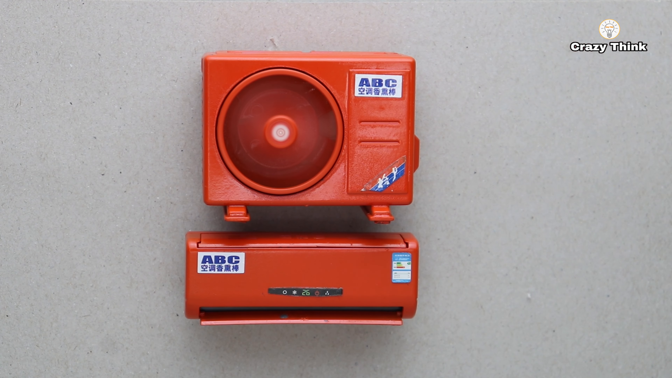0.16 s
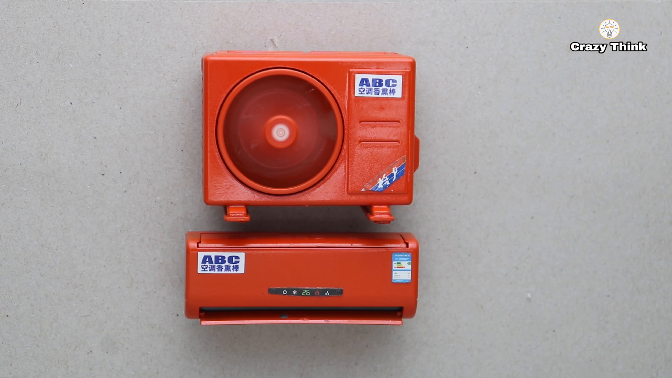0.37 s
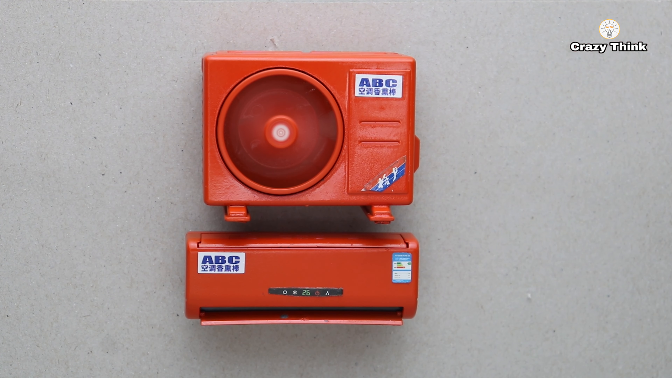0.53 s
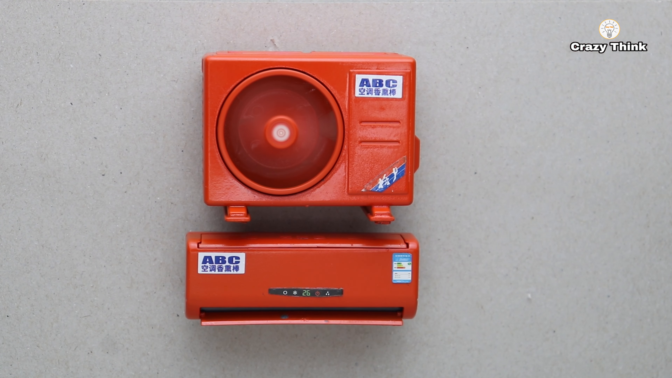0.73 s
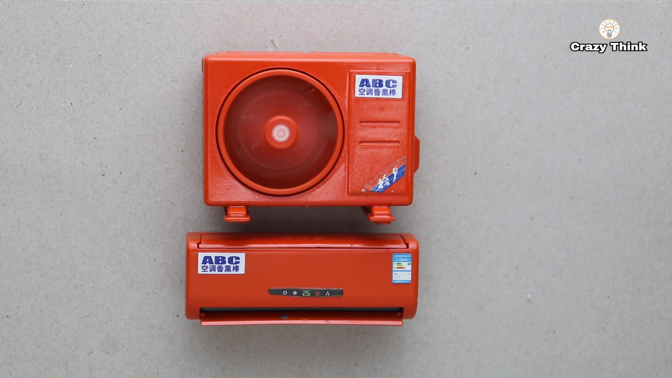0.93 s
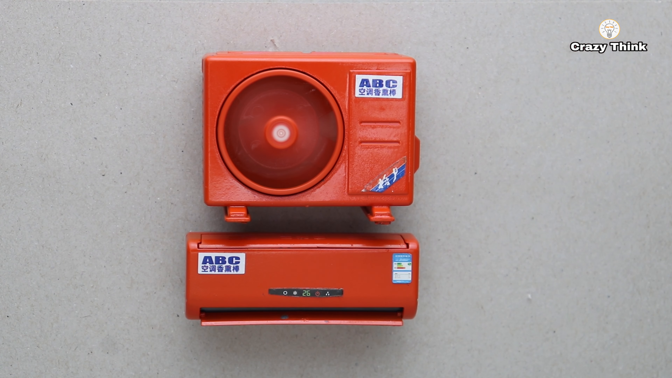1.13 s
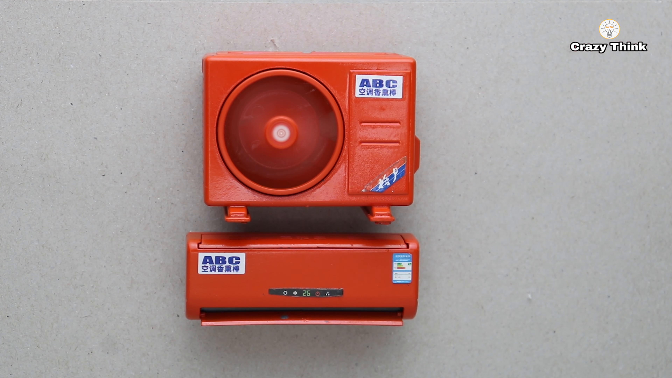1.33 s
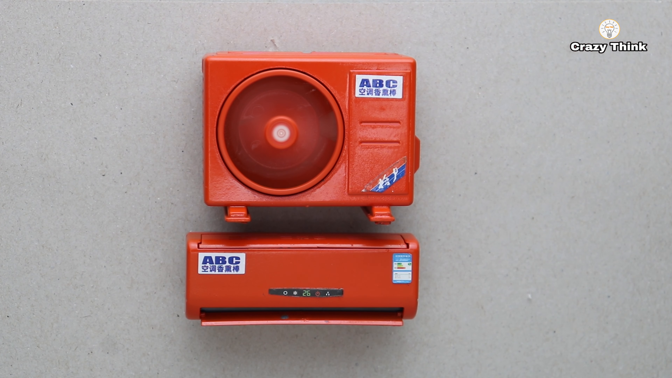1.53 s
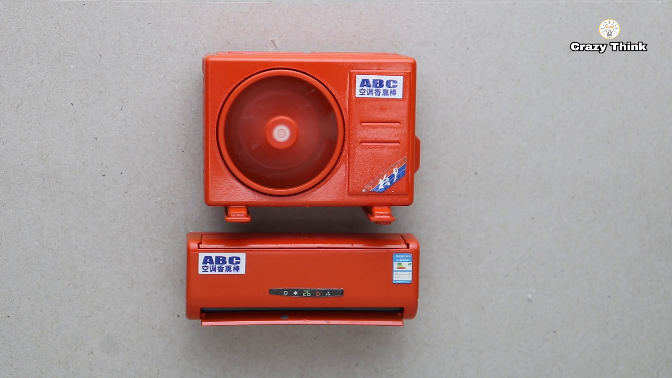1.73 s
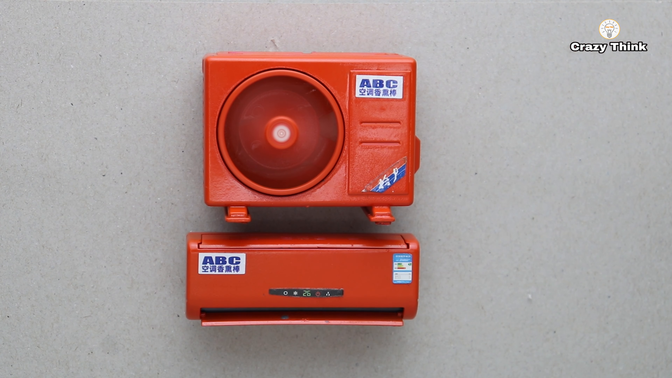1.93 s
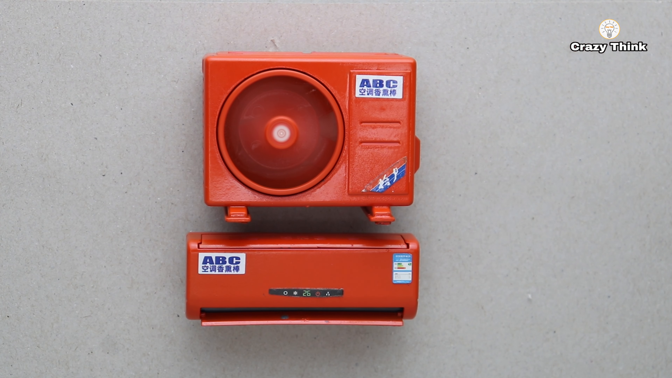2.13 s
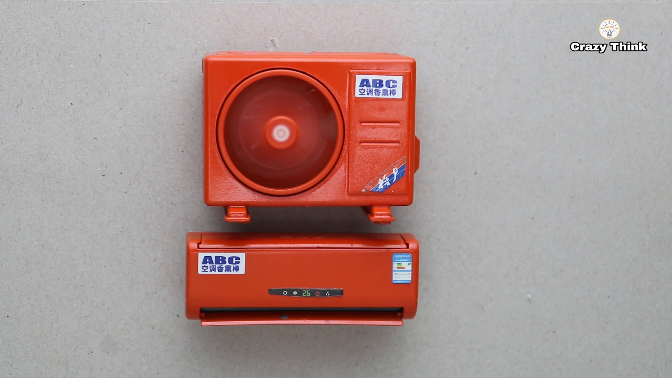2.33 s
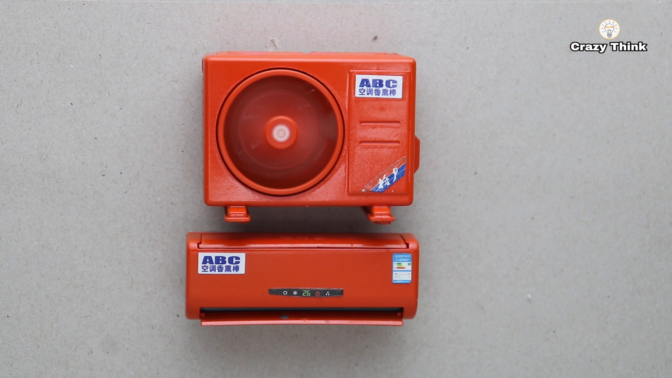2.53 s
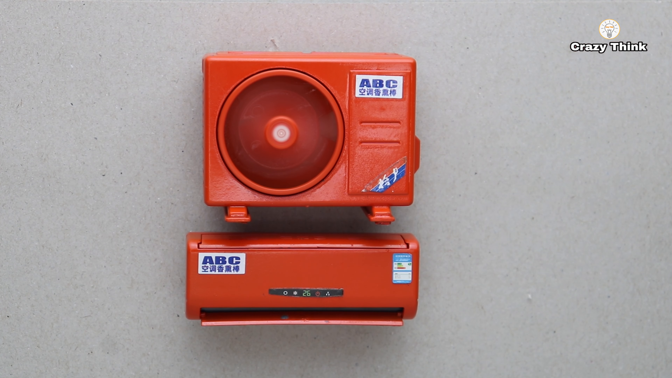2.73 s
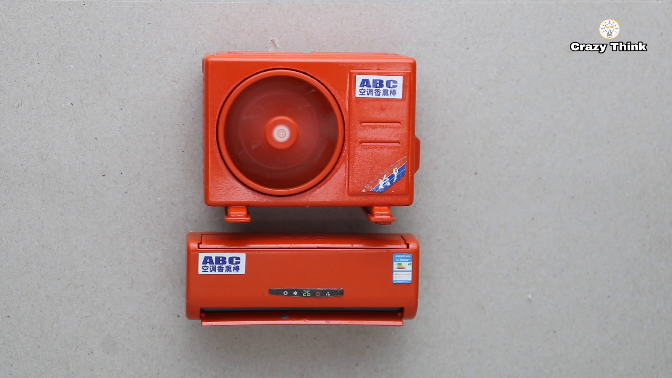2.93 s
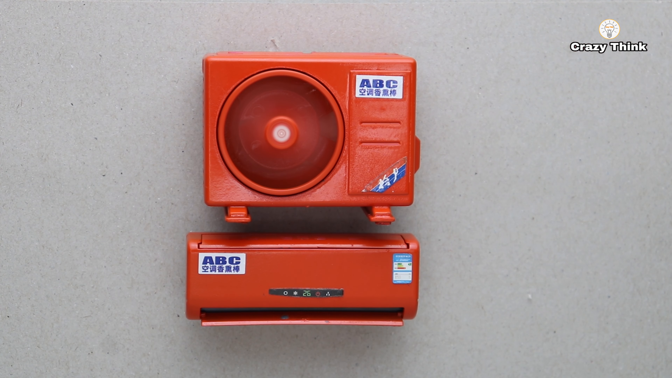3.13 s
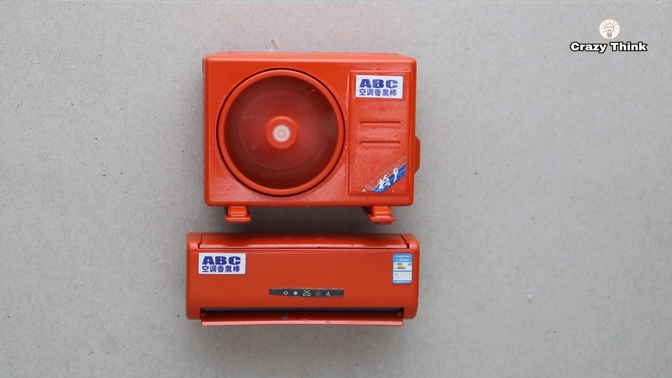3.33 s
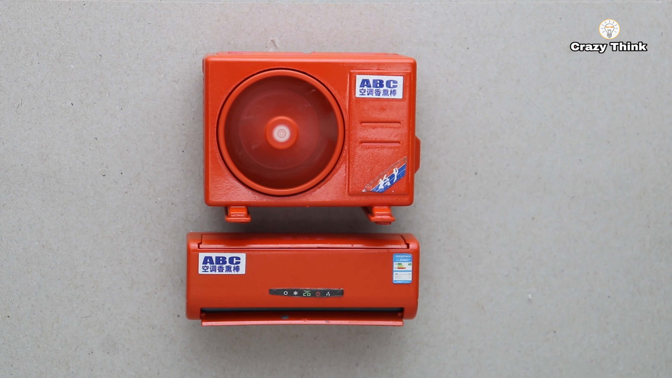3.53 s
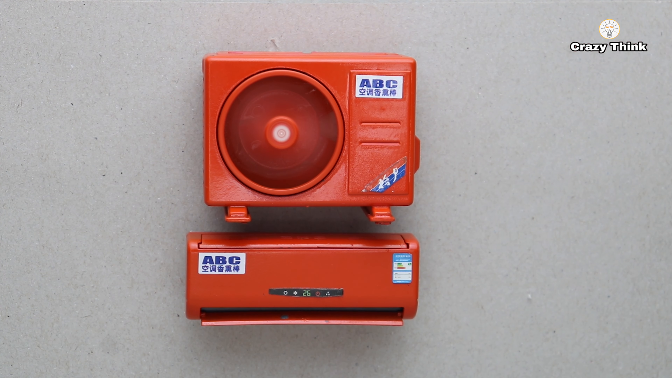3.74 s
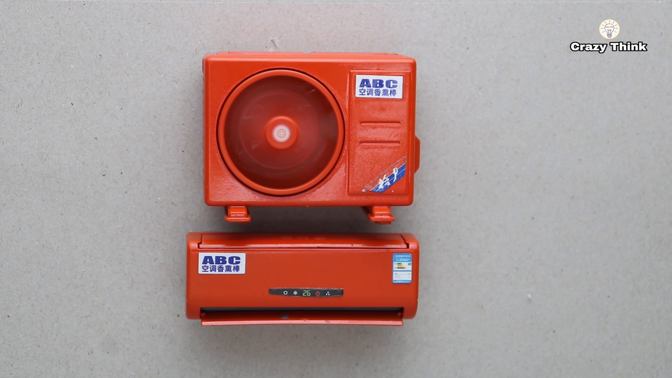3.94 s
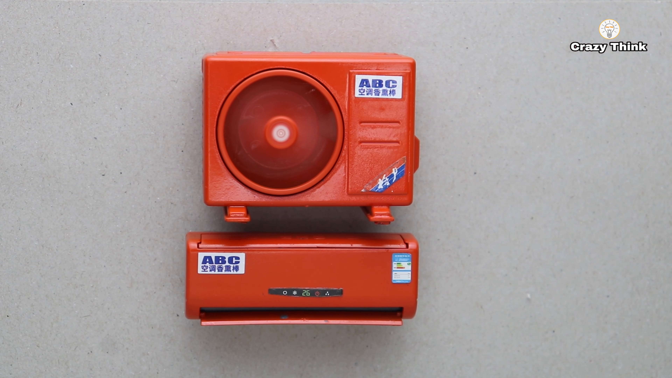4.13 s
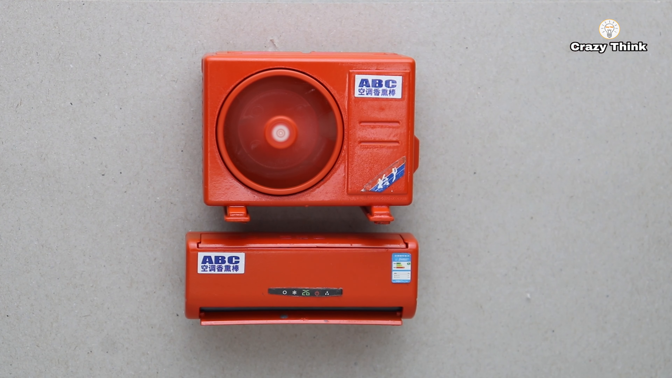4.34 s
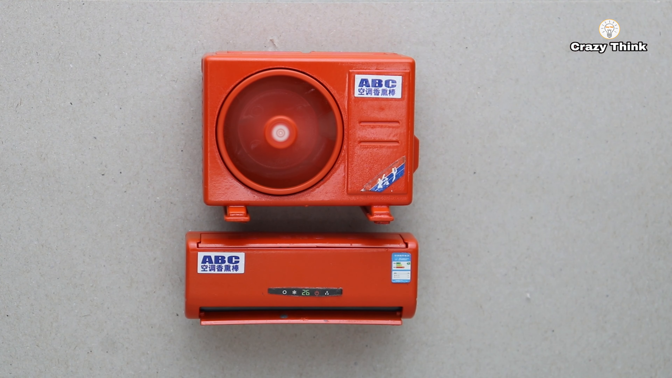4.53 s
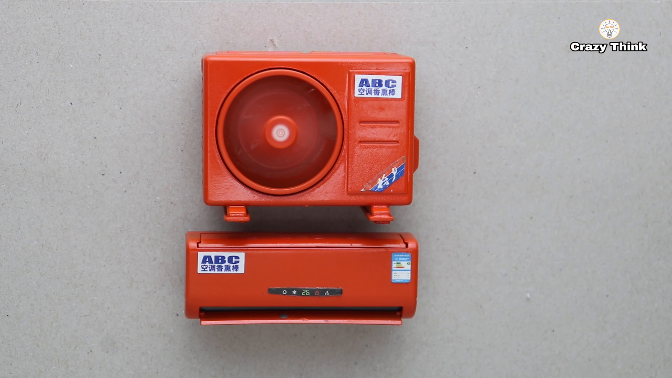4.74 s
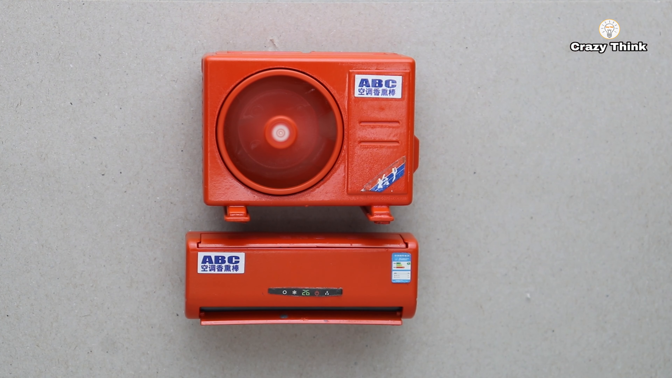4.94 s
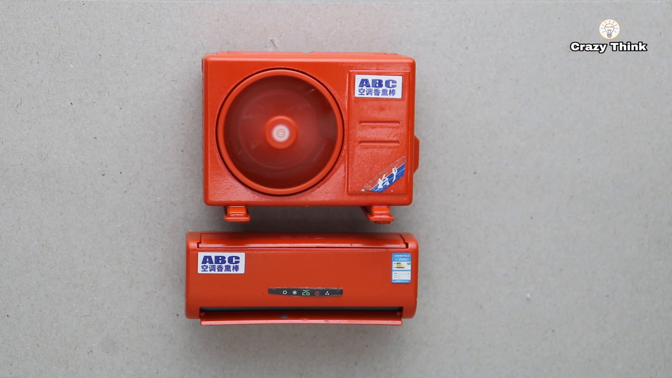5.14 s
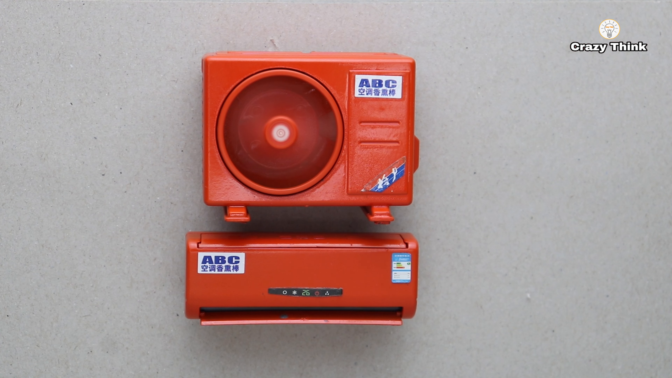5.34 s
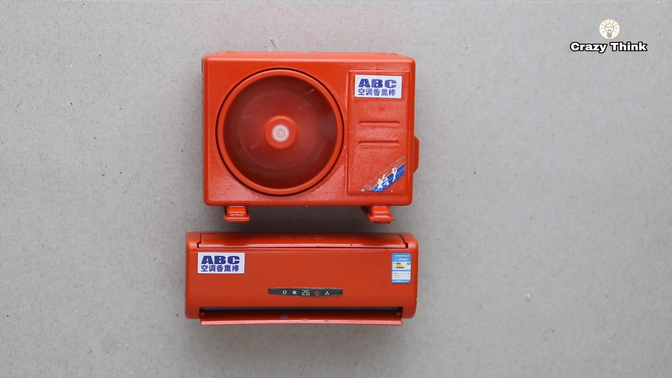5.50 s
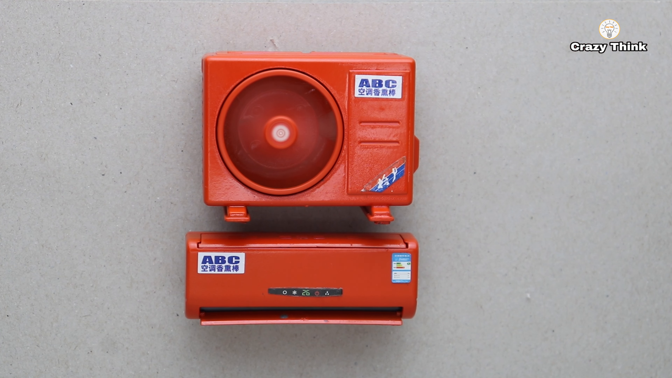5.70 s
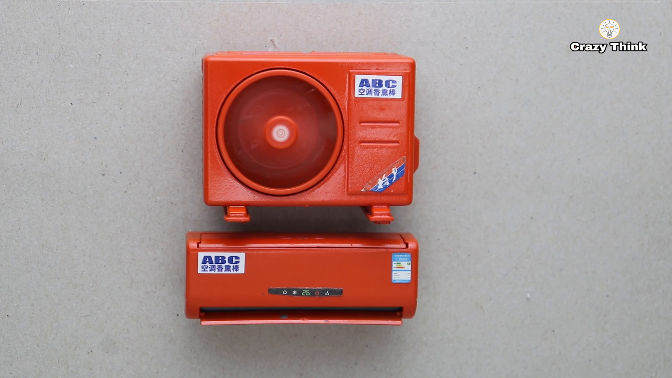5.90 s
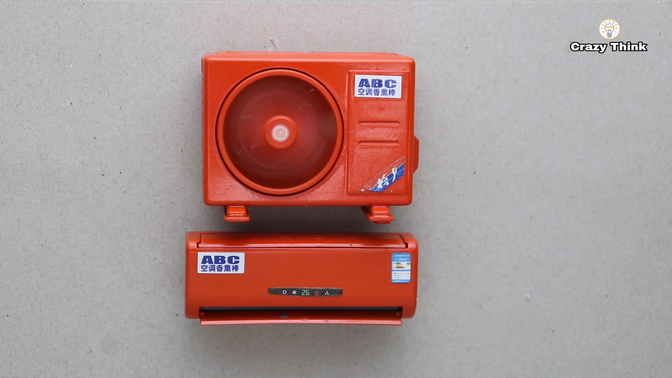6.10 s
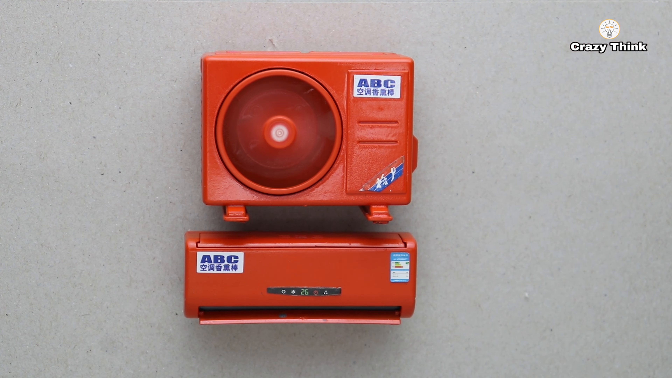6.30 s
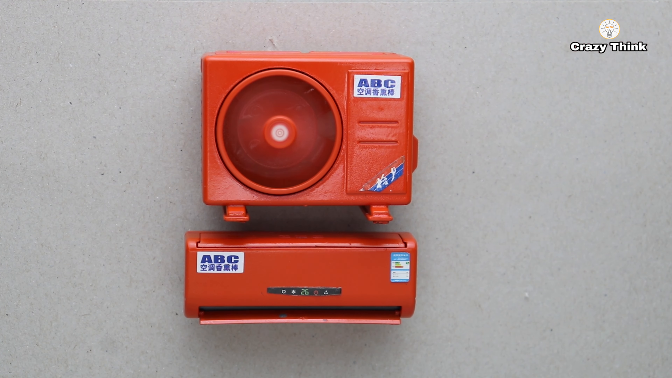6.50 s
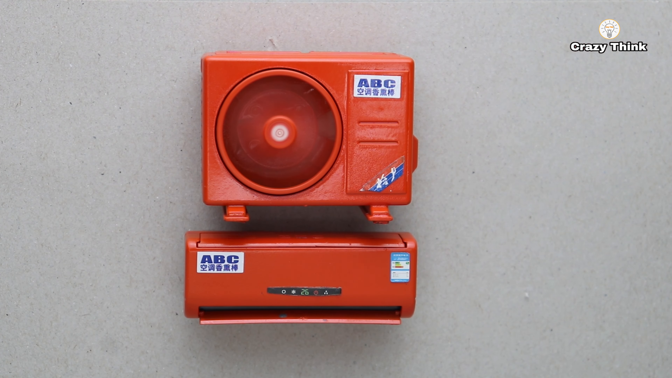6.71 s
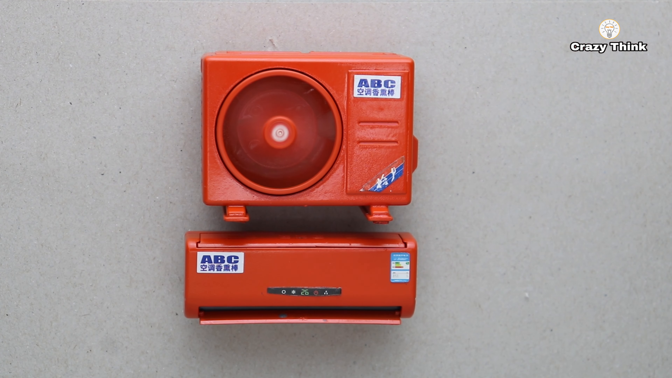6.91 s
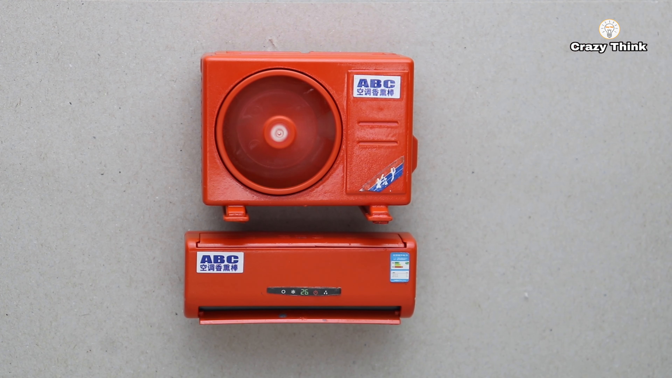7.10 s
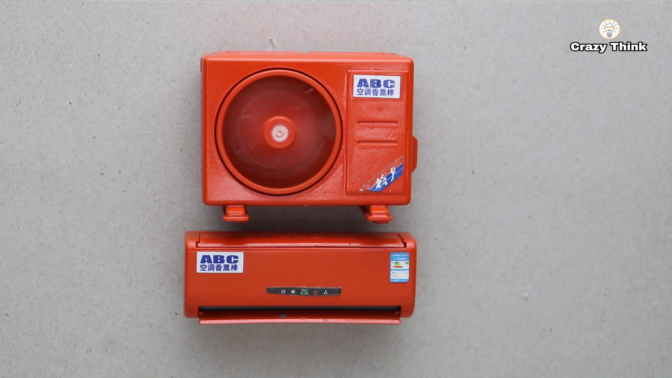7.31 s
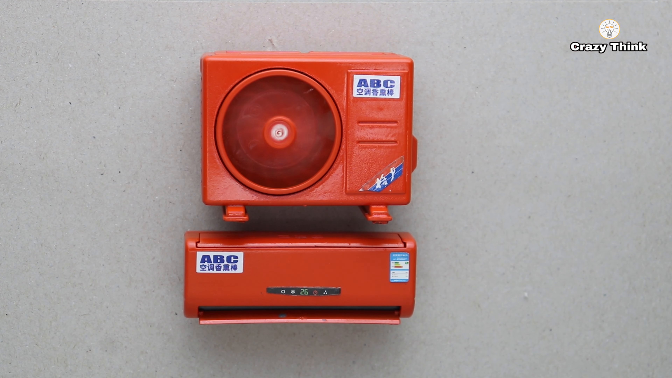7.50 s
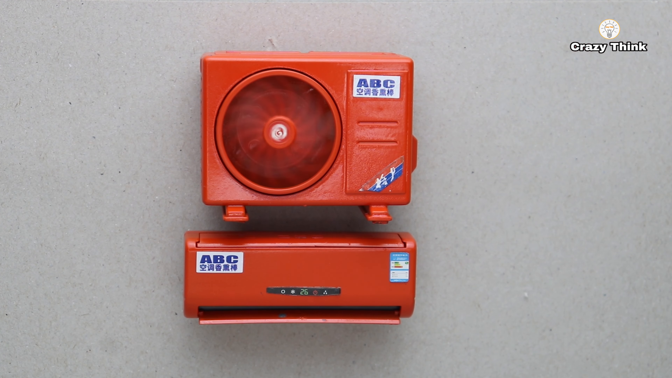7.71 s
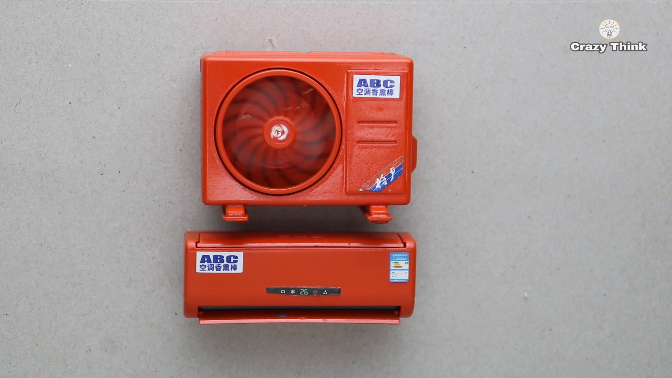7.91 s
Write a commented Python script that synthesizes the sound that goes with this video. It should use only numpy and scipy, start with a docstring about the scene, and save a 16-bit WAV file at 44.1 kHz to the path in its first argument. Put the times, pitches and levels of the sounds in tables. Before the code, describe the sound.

A miniature plastic fan is already whirring at the start, rising quickly to full level with brief puffs of wind against the close microphone. Then it runs almost unchanged: low hum, rushing air, fine brush hiss and faint shrill squeals that come and go. Its low blade hum softens after the middle, and the sound fades smoothly to nothing. No other sounds, no noticeable room echo.

```python
"""Toy air conditioner, close up

One microphone close to a small brush motor that spins a three-blade fan in a plastic housing.
The rotor hums as sines locked to the shaft; the blades churn the air as coloured, pulsing noise.
The brushes hiss as noise at the segment edges, and whine and now and then squeal on high shaft multiples.
The sound swells in the first second with a few gusts, a dry rasp dies away, the draught eases a little,
and all fades to silence."""
import sys
import numpy as np
from scipy import signal
from scipy.fft import rfft, irfft, next_fast_len
from scipy.io import wavfile

SR = 44100
rng = np.random.default_rng(int(sys.argv[2]) if len(sys.argv) > 2 else 0)


def output_pcm(signal):
    """Save a mono or channel-first signal as 16-bit PCM at the path in sys.argv[1].

    Samples are clipped to [-1, 1] before scaling.
    """
    pcm = np.clip(np.atleast_2d(signal).T, -1, 1) * 32767
    wavfile.write(sys.argv[1], SR, np.round(pcm).astype(np.int16))


N = 355225
TIME = np.arange(N) / SR  # seconds

# Shaft speed. Each row: time in seconds, turns a second in Hz.
SHAFT_SPEED = [(0.0, 128.94), (0.63, 128.2), (0.74, 129.02), (1.23, 129.67), (1.27, 129.22), (1.46, 129.5),
               (1.66, 128.03), (2.01, 128.66), (2.1, 128.13), (2.54, 129.69), (2.99, 129.55),
               (3.44, 130.69), (4.62, 130.55), (4.66, 130.27), (5.51, 130.02), (6.45, 130.69),
               (7.11, 130.08), (7.5, 130.26)]
# Swell of the treble, which every layer but the gusts follows by its own amount; only the distance below
# the last row counts. Each row: time in seconds, level in dB.
TREBLE_SWELL = [(0.0, -39.5), (0.342, -34.5), (0.482, -36.5), (0.79, -34), (1.4, -34)]
# Gusts of the fan's draught on the microphone. Each row: peak time in seconds, peak level in dB, decay in seconds.
DRAUGHT_GUSTS = [(.26, -29, .05), (.785, -19.5, .1), (1.0, -28.5, .07)]
# Colour of a gust. Each row: frequency in Hz, relative density in dB per Hz.
GUST_COLOUR = [(40, -26), (110, -14.5), (180, -9), (270, -2), (360, -8.5), (480, -10), (700, -23.5),
               (2000, -54.5)]
# Colour of the dry bearing rasp. Each row: frequency in Hz, relative density in dB per Hz.
RASP_COLOUR = [(600, -33.5), (1350, -14), (1650, 6), (1850, 3), (2080, -3), (2330, -1.5), (2600, -14.5),
               (3000, -19.5), (6000, -39)]
# Colour of the brush hiss. Each row: frequency in Hz, relative density in dB per Hz.
HISS_COLOUR = [(1500, -19), (2850, -6), (3200, -3), (3600, 3.5), (4500, -.5), (5700, -0.5), (7000, -2),
               (8000, -3), (9700, -3.5), (11000, -8), (12000, -10), (14500, -11), (15700, -11.5)]
# Brush tones. Each row: multiple of the shaft speed, level in dB while the brushes drag, level in dB when they run free.
BRUSH_TONES = [(39, -54, -53), (42, -55, -55), (46, -53, -51), (47, -49, -51), (49, -49, -51),
               (50, -53, -49), (51, -51, -53), (52, -50, -50), (53, -54, -55), (55, -53, -50),
               (57, -55, -48), (58, -55, -58), (60, -57, -56), (75, -53, -52), (81, -55, -49),
               (83, -49, -46), (84, -46.5, -48.5), (87, -49, -55), (90, -56, -59), (99, -60, -59),
               (102, -62, -57), (106, -63, -58), (108, -58, -59), (111, -56, -56), (114, -57, -53),
               (117, -56, -56)]
# Faint buzz on all other multiples. Each row: frequency in Hz, level of one tone in dB before the buzz trim.
BUZZ_LEVELS = [(3500, -61.5), (5000, -59.5), (6800, -59.5), (8000, -68), (9400, -66), (11200, -59.5),
               (12300, -64), (13800, -63.5), (15600, -60.5)]
# A brush squeals on one multiple. Each row: start in seconds, length in seconds, multiple of the shaft speed,
# rise above its usual level in dB.
BRUSH_SQUEALS = [(-.3, .6, 81, 9), (-.3, 1.2, 111, 4.5), (.9, 1.9, 51, 6.5), (1.4, 1.3, 84, 3.5),
                 (1.75, .9, 58, 7), (3.05, 2.0, 81, 8), (6.7, 1.1, 51, 7)]
# Colour of the air churned by the blades. Each row: frequency in Hz, relative density in dB per Hz.
CHURN_COLOUR = [(10, -46.5), (35, -20.5), (50, -13), (70, -14), (100, -7), (160, 0), (250, 0), (350, -2.5),
                (500, -6), (800, -15), (1500, -27), (4000, -55)]
# Colour of the air rushing through the housing. Each row: frequency in Hz, relative density in dB per Hz.
HOUSING_COLOUR = [(150, -19.5), (450, -4.5), (680, -1), (950, -2), (1100, -1), (1270, 2), (1470, -3),
                  (1620, 0.5), (1820, 0), (2050, -5.5), (2450, -8.5), (2850, -17), (4000, -25.5),
                  (9000, -50.5)]

DRAG_HZ, FREE_HZ = 128.8, 130.3  # shaft speeds with dragging and with free brushes
EASE_AT_S, EASE_S = 5.03, 0.27  # the draught eases once: when, and how long it takes
SQUEAL_ATTACK_S, SQUEAL_RELEASE_S = 0.3, 0.32
BAND_LIMIT_HZ = 15750


def gain_of(db):
    """Decibels to amplitude."""
    return 10 ** (np.asarray(db) / 20)


def evened(x):
    """Scales to an rms of one."""
    return x / np.sqrt(np.mean(x ** 2) + 1e-20)


def follow(rows):
    """A time table, drawn as straight lines at every sample."""
    return np.interp(TIME, *np.transpose(rows))


def read(points, hz):
    """A frequency table, read in dB on a log-frequency axis."""
    f, value = np.transpose(points)
    return np.interp(np.log(hz + 1), np.log(f + 1), value)


def ramp(start, length):
    """Goes from zero to one over length seconds."""
    return np.clip((TIME - start) / length, 0, 1)


def wander(hz):
    """Slow chance of rms one, with changes mostly up to about hz."""
    size = 2048
    f = np.fft.rfftfreq(size, TIME[-1] / size)
    lowpass = (f > 0) / (1 + (f / hz) ** 2)
    slow = irfft(rfft(rng.standard_normal(size)) * lowpass)
    return np.interp(TIME, np.linspace(0, TIME[-1], size), evened(slow))


def noise(colour_table, envelope):
    """Noise that pulses with the envelope, then takes the colour of the table, at an rms of one."""
    size = next_fast_len(N)
    colour = gain_of(read(colour_table, np.fft.rfftfreq(size, 1 / SR)))
    spectrum = rfft(envelope * rng.standard_normal(N), size)
    return evened(irfft(spectrum * colour, size)[:N])


def tone(turns, multiple, level_db):
    """A sine locked to the shaft, at an rms level in dB and a random phase."""
    cycles = round(multiple) * turns + rng.random()
    return np.sqrt(2) * gain_of(level_db) * np.sin(2 * np.pi * cycles)


def swell():
    """Decibels relative to the settled level: below zero at first, then zero."""
    return follow(TREBLE_SWELL) - TREBLE_SWELL[-1][1]


def shaft():
    """Turns made so far; uneven friction makes the speed flutter slightly."""
    flutter = 0.00013 * wander(10)  # fraction of the speed
    return np.cumsum(follow(SHAFT_SPEED) * (1 + flutter)) / SR


def gusts(rise_s=0.04):
    """The draught buffets the microphone: each gust builds quickly and trails away."""
    push = np.zeros(N)
    for peak_s, peak_db, decay_s in DRAUGHT_GUSTS:
        before = (peak_s - TIME) / rise_s
        after = (TIME - peak_s) / decay_s
        push += gain_of(peak_db) * np.exp(-np.where(TIME < peak_s, before, after))
    return noise(GUST_COLOUR, 1) * push


def bearing(turns, rasp_db=-32.5, settle_db_per_s=6.5, settled_db=-56.0, wobble=0.33, rasp_swell=0.6):
    """The shaft rubs one side of its bearing on every turn, a rasp that settles to a faint remainder."""
    dying = gain_of(rasp_db + rasp_swell * swell() - settle_db_per_s * TIME)
    rubbing = 1 + wobble * np.sin(2 * np.pi * turns)
    return noise(RASP_COLOUR, rubbing) * (dying + gain_of(settled_db))


def brush_hiss(turns, hiss_db=-34.0, scrape=0.27, grit_db=4.5, flicker_db=0.48, hiss_swell=0.9):
    """The brushes scrape harder at each of the six segment edges that pass in a turn."""
    edges = 6 * turns
    edge = edges.astype(int)
    worn = rng.uniform(0.5, 1.5, size=6)  # each segment is worn differently
    grit = gain_of(grit_db * rng.standard_normal(N)[edge])  # one draw for each passing edge
    strength = worn[edge % len(worn)] * grit
    scraping = 1 + scrape * strength * np.exp(-(edges % 1) / 0.3)
    flicker = gain_of(flicker_db * wander(40))
    return noise(HISS_COLOUR, scraping * flicker) * gain_of(hiss_db + hiss_swell * swell())


def squeal(multiple):
    """Decibels that one brush tone gains as a squeal builds, holds and lets go."""
    gained_db = 0
    for start, length, squealing, rise_db in BRUSH_SQUEALS:
        if squealing == multiple:
            release = ramp(start + length - SQUEAL_RELEASE_S, SQUEAL_RELEASE_S)
            gained_db = gained_db + rise_db * ramp(start, SQUEAL_ATTACK_S) * (1 - release)
    return gained_db


def brush_whine(turns, buzz_db=-2.0, whine_swell=0.55, shimmer_db=0.6, drift_db=1.4, drift_hz=0.6):
    """Segment edges repeat every turn and ring the brush springs: high multiples whose balance shifts with the drag."""
    free = np.clip((follow(SHAFT_SPEED) - DRAG_HZ) / (FREE_HZ - DRAG_HZ), 0, 1)
    whine = np.zeros(N)
    for multiple, drag_db, free_db in BRUSH_TONES:
        usual_db = drag_db + free * (free_db - drag_db)
        whine += tone(turns, multiple, usual_db + squeal(multiple) + drift_db * wander(drift_hz))
    named = {round(row[0]) for row in BRUSH_TONES}
    for multiple in range(32, 121):
        if multiple not in named:
            faint_db = read(BUZZ_LEVELS, multiple * FREE_HZ) + buzz_db
            whine += tone(turns, multiple, faint_db + drift_db * wander(drift_hz))
    return whine * gain_of(whine_swell * swell() + shimmer_db * wander(30))


def air(turns, churn_db=-26.0, housing_db=-28.5, swirl=0.068, lumps_db=0.64, flicker_db=0.5,
        churn_swell=1.6, housing_swell=0.51, churn_ease_db=0.96, rush_ease_db=0.5, rush_db_per_hz=0.43):
    """Lumpy turbulence swells once a turn, over a steadier rush through the housing that grows with the speed."""
    eased = ramp(EASE_AT_S, EASE_S)
    pulsing = 1 + swirl * np.cos(2 * np.pi * turns)
    churn_level_db = churn_db + churn_swell * swell() - churn_ease_db * eased
    churn = noise(CHURN_COLOUR, pulsing * gain_of(lumps_db * wander(20))) * gain_of(churn_level_db)
    speed_db = rush_db_per_hz * (follow(SHAFT_SPEED) - FREE_HZ)
    rush_level_db = housing_db + housing_swell * swell() - rush_ease_db * eased + speed_db
    rush = noise(HOUSING_COLOUR, gain_of(flicker_db * wander(25))) * gain_of(rush_level_db)
    return churn + rush


def hum(turns, imbalance_db=-26.0, twice_db=-36.4, blades_db=-27.0,
        waver_db=0.35, twice_waver_db=2.1, blade_waver_db=0.45,
        rotor_swell=1.2, blade_swell=1.6, ease_db=4.0):
    """The unbalanced rotor shakes the case; each blade pushes a puff of air, weaker once the draught eases."""
    rotor_swell_db = rotor_swell * swell()
    once = tone(turns, 1, imbalance_db + rotor_swell_db + waver_db * wander(4))
    twice = tone(turns, 2, twice_db + rotor_swell_db + twice_waver_db * wander(7))
    puff_db = blades_db + blade_swell * swell() - ease_db * ramp(EASE_AT_S, EASE_S)
    puffs = tone(turns, 3, puff_db + blade_waver_db * wander(3.9))  # three blades a turn
    return once + twice + puffs


def scene():
    """Everything turns with one shaft; both channels carry the same sound."""
    turns = shaft()
    draught = gusts() + air(turns)
    motor = bearing(turns) + brush_hiss(turns) + brush_whine(turns) + hum(turns)
    fan = draught + motor
    return np.array([fan, fan])


def record(dry, fade_start=6.843, fade_end=7.548):
    """A straight fade to silence between two times in seconds, then the band limit."""
    faded = dry * np.clip((fade_end - TIME) / (fade_end - fade_start), 0, 1)
    lowpass = signal.firwin(1501, BAND_LIMIT_HZ, window=("kaiser", 9), fs=SR)
    return signal.oaconvolve(faded, lowpass[None], "same")


dry = scene()
out = record(dry)
output_pcm(out)
```